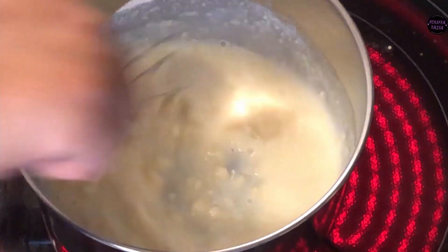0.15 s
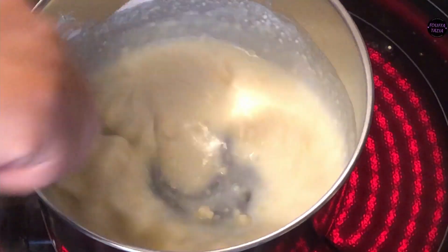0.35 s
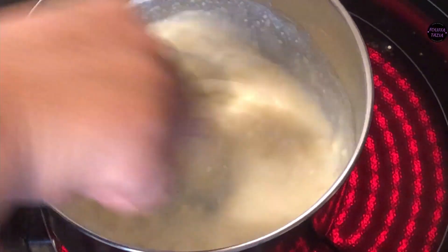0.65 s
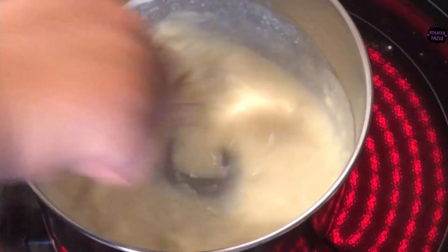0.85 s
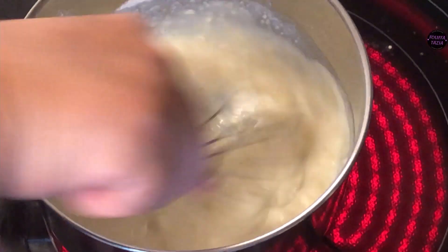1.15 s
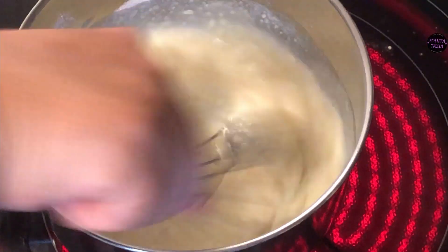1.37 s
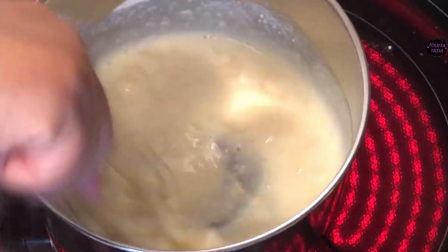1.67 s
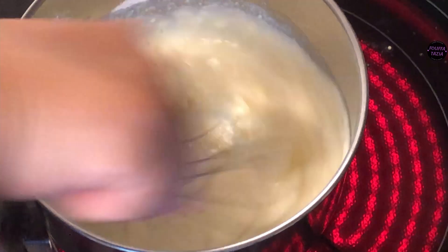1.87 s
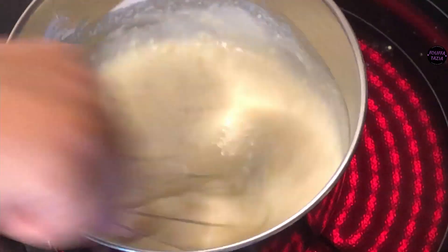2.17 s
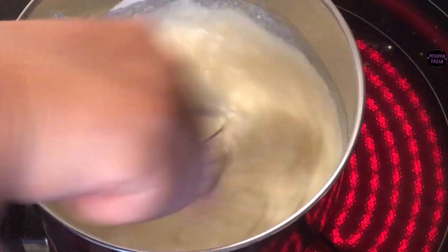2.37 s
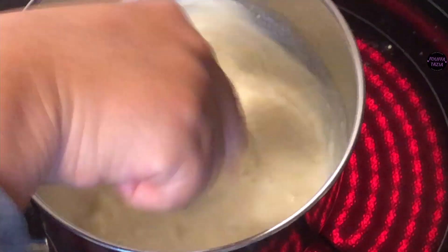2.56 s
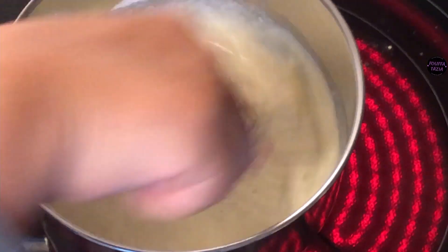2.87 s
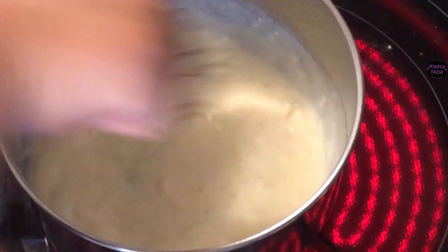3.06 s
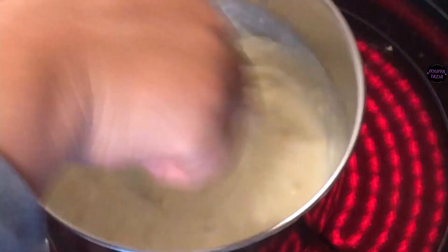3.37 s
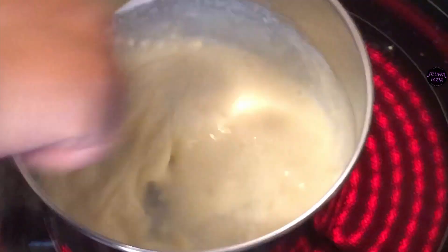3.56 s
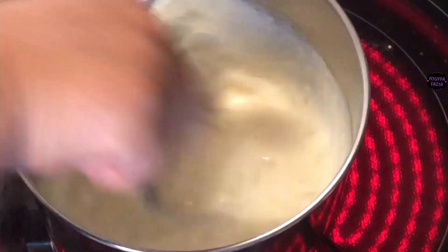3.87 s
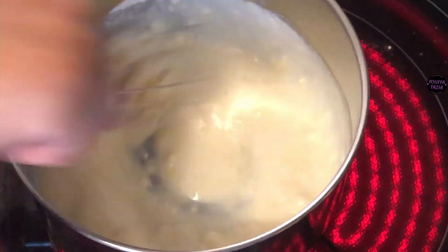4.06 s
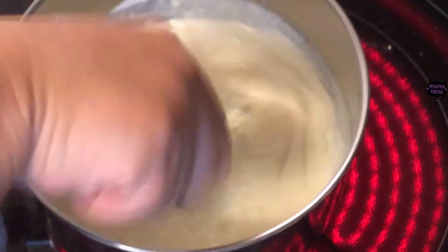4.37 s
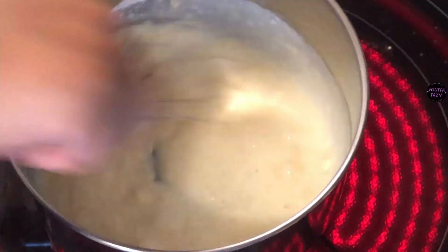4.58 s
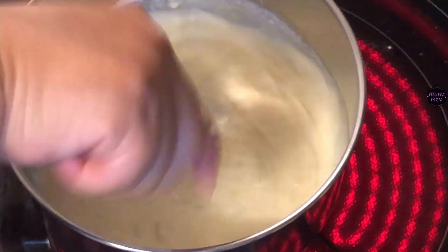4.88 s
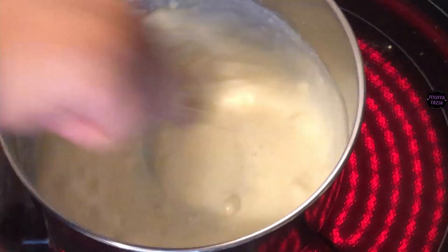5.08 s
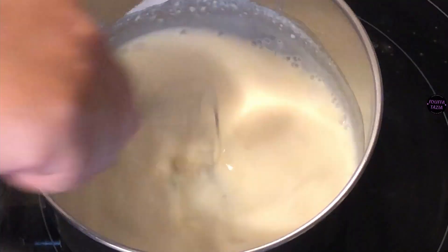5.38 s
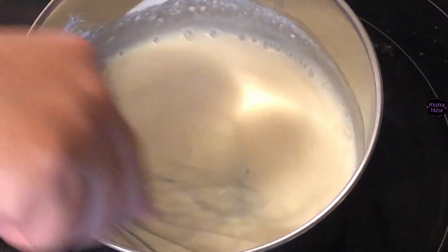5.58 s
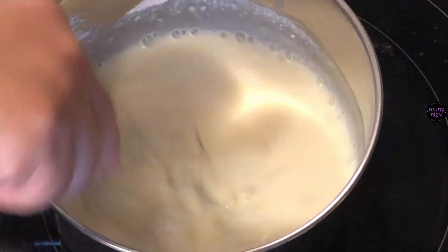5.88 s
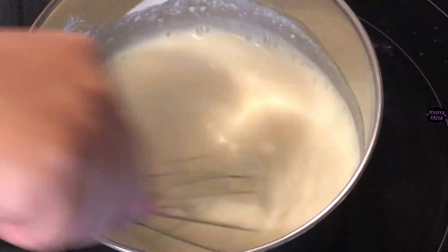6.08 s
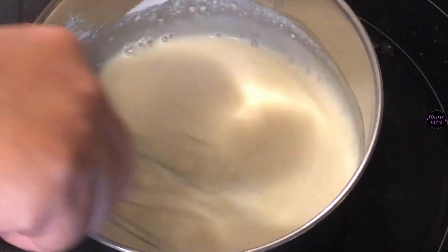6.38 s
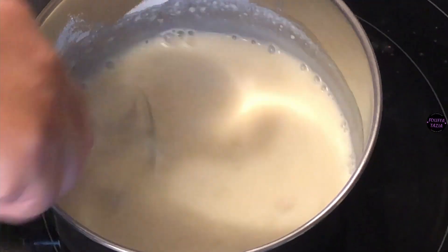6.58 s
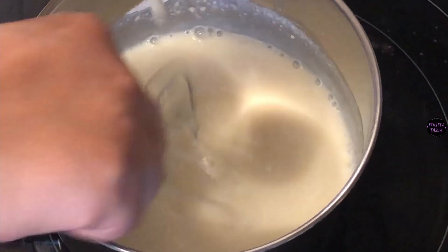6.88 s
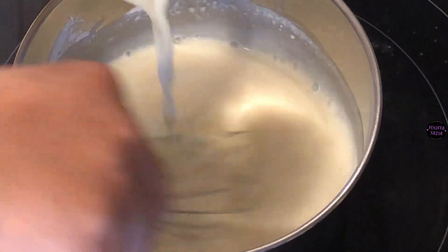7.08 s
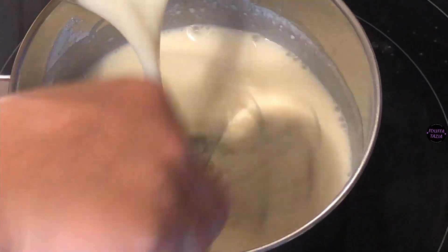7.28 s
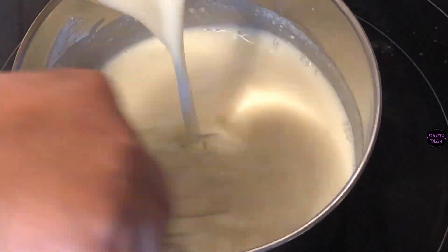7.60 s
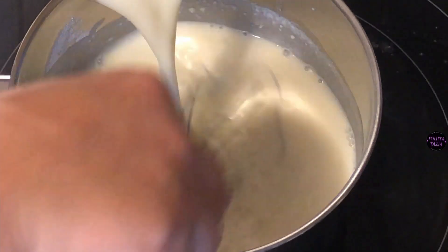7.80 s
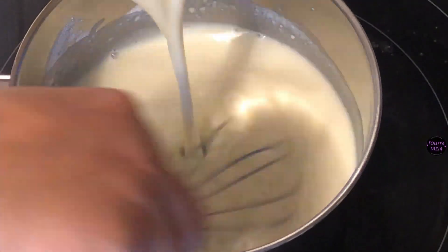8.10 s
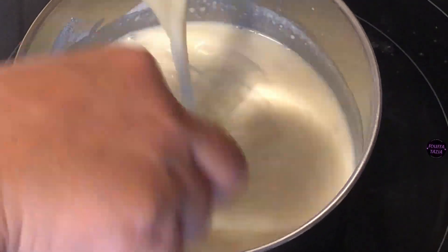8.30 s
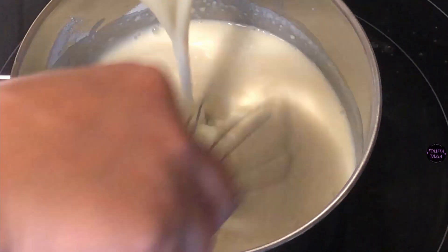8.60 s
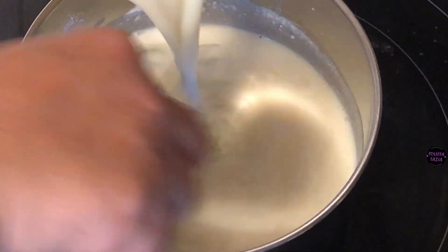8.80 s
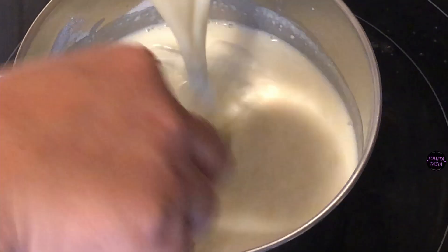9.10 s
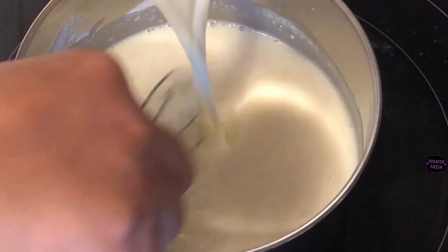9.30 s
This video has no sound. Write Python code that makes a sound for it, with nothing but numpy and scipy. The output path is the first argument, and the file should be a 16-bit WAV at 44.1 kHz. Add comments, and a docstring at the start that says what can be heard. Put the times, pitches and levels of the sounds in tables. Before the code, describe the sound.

A wire whisk sweeps quickly round a steel saucepan, close to a small microphone. Scratchy rubbing strokes and thin hiss come several times a second, with bright clinks on the wall and tiny wire snaps. Midway the sauce is thinner and the strokes softer, with a faint metallic singing; then milk splashes in with dense little plops. Two distant hollow knocks echo in the kitchen over low hum.

```python
"""A kitchen hob: a wire whisk is swept round a steel saucepan of thin sauce, close to a small microphone.
The wires scrape the base (stick-slip noise through the pan's modes) and sing once the sauce is thinner.
They clink on the wall (a crack and ringing modes) and snap against each other (bare bright clicks).
Sauce and, later, poured milk plop as short rising tones. Further off something knocks twice, mostly
as reverberation, and appliances hum under it all (shaped noise and wavering tones)."""
import sys
import numpy as np
from scipy import signal
from scipy.fft import rfft, irfft
from scipy.io import wavfile
from scipy.ndimage import uniform_filter1d

SR = 44100
rng = np.random.default_rng(int(sys.argv[2]) if len(sys.argv) > 2 else 0)


def generate_wav(sig):
    """Save sig (samples, or channels by samples) to the path in sys.argv[1] as 16-bit PCM at SR."""
    pcm = np.round(np.clip(np.atleast_2d(sig).T, -1, 1) * 32767).astype(np.int16)
    wavfile.write(sys.argv[1], SR, pcm)


N = 416744  # samples

THIN_S, POUR_S = 5.22, 7.1  # the sauce is thinner from here on; milk starts to splash in

# Ringing modes of pan and wires, the first four below 3.5 kHz: pitch_hz, level_db, t60_s
PAN_MODES = [(1585, 0, 0.05), (2412, 2, 0.1), (2802, 2, 0.1), (3440, -4, 0.09), (3640, -4, .1),
             (4150, -4, .1), (4400, -1, .13), (4660, -6, .13), (4925, -1, .12), (5730, -1, .09),
             (5932, -4, .24), (6850, -2, .06), (9880, -3, .05), (10600, 1, .035)]


def amp(db):
    """Decibels to amplitude."""
    return 10 ** (np.asarray(db) / 20)


def evened(x):
    """Scales x to rms 1."""
    return x / np.sqrt(np.mean(x ** 2) + 1e-20)


def add(mix, s, sound):
    """Adds a sound into the mix at s seconds, cut off at the end."""
    part = mix[round(s * SR):][:len(sound)]
    part += sound[:len(part)]


def coloured(x, points):
    """Shapes x by a spectrum of (Hz, dB) points, to rms 1."""
    point_hz, point_db = np.transpose(points)
    hz = np.fft.rfftfreq(len(x), 1 / SR)
    gain_db = np.interp(np.log(hz + 1), np.log(point_hz), point_db)
    return evened(irfft(rfft(x) * amp(gain_db), len(x)))


def resonate(x, hz, width_hz):
    """A resonance of gain 1 that follows hz: shift down, smooth, shift back."""
    turn = np.exp(2j * np.pi * np.cumsum(hz * np.ones(len(x))) / SR)
    r = np.exp(-np.pi * width_hz / SR)
    return 2 * (turn * signal.lfilter([1 - r], [1, -r], x / turn)).real


def wander(per_s, count):
    """Slow random curves: straight lines between normal draws, per_s of them a second."""
    steps = rng.standard_normal((count, int(per_s * N / SR) + 2))
    at = np.arange(N) / SR * per_s
    return [np.interp(at, np.arange(len(row)), row) for row in steps]


def kitchen():
    """Appliances: steady shaped noise, and hum lines that a narrow band of noise makes waver."""
    # Spectrum of the background noise: freq_hz, level_db
    room_spectrum = [(30, -9), (42, -15), (52, 6.5), (130, -4.5), (260, -14), (450, -28), (1000, -14),
                     (2300, -6), (4000, -20.5), (16000, -33)]
    # Hum lines: pitch_hz, width_hz, level_db (of the steady tone)
    hum_lines = [(120, 8, -64), (178, 5, -69), (1390, 10, -71)]
    t = np.arange(N) / SR
    noise = rng.standard_normal(N)
    out = amp(-55.5) * coloured(rng.standard_normal(N), room_spectrum)
    for hz, width_hz, db in hum_lines:
        tone = evened(np.sin(2 * np.pi * hz * t))
        waver = evened(resonate(resonate(noise, hz, width_hz), hz, width_hz))
        out = out + amp(db) * (tone + width_hz / 20 * waver)
    return out


def knocks():
    """Far off, a knock arrives mostly as reverberation: a soft rise, hollow rings, a long fade."""
    # The distant knocks: start_s, level_db (before the soft rise)
    knock_times = [(5.297, -21.5), (7.628, -23)]
    # Spectrum of their noise: freq_hz, level_db
    knock_spectrum = [(450, -35), (800, -20.5), (1300, -6), (2300, -5), (4000, -15), (9000, -39)]
    # Their hollow rings: pitch_hz, width_hz, level_db (against each other)
    hollow_rings = [(1374, 8, -2), (1784, 25, 5.5), (2146, 61, 4)]
    t60_s = 0.41
    out, t = np.zeros(N), np.arange(SR // 2) / SR
    rise = 1 - np.exp(-(t / 0.028) ** 0.71)
    for s, db in knock_times:
        noise = rng.standard_normal(len(t))
        rings = sum(amp(ring_db) * evened(resonate(noise, hz, width_hz))
                    for hz, width_hz, ring_db in hollow_rings)
        body = coloured(noise, knock_spectrum) + 0.55 * evened(rings)
        add(out, s, amp(db - 60 * t / t60_s) * body * rise)
    return out


def stroke_db(t, column, sag_db, fall_db):
    """Every pass rises, holds with a slight sag and falls away; passes add in power over the rest level."""
    # Passes of the wires over the base: start_s, hold_s, rub_db, hiss_db
    passes = [(0.098, 0.028, -36.5, -41.5), (0.46, 0.26, -47, -58), (0.909, 0.036, -41.5, -45),
              (1.59, 0.045, -35.5, -45.5), (1.864, 0.16, -48, -50), (2.03, 0.12, -42.5, -39),
              (2.263, 0.1, -48.5, -43.5), (2.39, 0.087, -44, -64), (2.635, 0.031, -53, -40),
              (2.825, 0.078, -67, -43), (2.982, 0.0062, -41, -47), (3.062, 0.095, -44.5, -41.5),
              (3.387, 0.081, -54, -42.5), (3.528, 0.011, -38, -61), (3.589, 0.0065, -60, -40.5),
              (3.722, 0.027, -49, -40), (3.918, 0.073, -47.5, -40.5), (4.134, 0.082, -43, -40),
              (4.547, 0.017, -38.5, -53), (4.704, 0.0073, -49, -45.5), (4.882, 0.12, -45.5, -45),
              (5.113, 0.05, -43, -41.5), (5.258, 0.059, -43.5, -44.5), (5.54, 0.025, -53, -47),
              (5.803, 0.078, -46.5, -49.5), (6.027, 0.16, -45, -48.5), (6.304, 0.045, -44.5, -44.5),
              (6.423, 0.12, -38.5, -43.5), (6.661, 0.064, -48, -44), (6.768, 0.026, -49.5, -44.5),
              (7.04, 0.15, -55.5, -47), (7.267, 0.12, -64, -42.5), (7.494, 0.2, -42.5, -44.5),
              (7.854, 0.12, -47.5, -43), (8.04, 0.17, -72, -43.5), (8.353, 0.12, -44, -45),
              (8.63, 0.12, -39.5, -46.5), (8.904, 0.26, -41, -48.5), (9.213, 0.054, -40.5, -42)]
    # Light contact between the passes: time_s, rub_db, hiss_db
    light_contact = [(0.0, -44.5, -53.5), (1.5, -46, -51), (4.3, -49, -54), (5.3, -57, -62.5),
                     (5.7, -60, -60.5), (7.0, -65.5, -56.5), (7.4, -44, -82), (9.45, -52.5, -62.5)]
    rise_db = 463  # per second, like sag_db and fall_db
    start, hold, peak_db = np.array(passes)[:, [0, 1, column + 1], None].transpose(1, 0, 2)
    since = t - start
    rise = rise_db * np.minimum(since, 0)
    sag = sag_db * np.maximum(since, 0)
    fall = fall_db * np.maximum(since - hold, 0)
    power = (amp(peak_db + rise - sag - fall) ** 2).sum(0)
    rest_columns = np.transpose(light_contact)
    rest_db = np.interp(t, rest_columns[0], rest_columns[column])
    return 10 * np.log10(power + amp(rest_db) ** 2), rest_db


def sweep():
    """The whisk's motion every 2 ms: levels of rub and hiss, and how far the hiss stands above rest."""
    s = np.arange(0, N / SR, .002)
    rub_db, _ = stroke_db(s, column=1, sag_db=5, fall_db=129)
    hiss_db, rest_db = stroke_db(s, column=2, sag_db=19.5, fall_db=189)
    return s, rub_db, hiss_db, hiss_db - rest_db


def random_droplets():
    """Droplets fall at random, densely once milk pours in, and louder where the whisk is louder."""
    when, size, pitch, length = rng.random((1600, 4)).T
    when = np.interp(when, [0, .15, 1], [0, POUR_S, N / SR])  # 15 % of them before the milk
    s, rub_db, hiss_db, _ = sweep()
    whisk_db = np.interp(when, s, (rub_db + hiss_db) / 2)
    level_db = whisk_db + np.where(when < POUR_S, 2, 5) + 11 * size ** 3
    # pitches crowd where the pan's modes crowd
    hz = np.interp(pitch ** 2 * len(PAN_MODES), np.arange(len(PAN_MODES)), np.transpose(PAN_MODES)[0])
    return list(zip(when, level_db, hz, 12 + 40 * length ** 2))


def plops():
    """A bubble rings a few cycles and rises in pitch, with a tick as the surface breaks."""
    # Single plops of sauce: start_s, level_db, pitch_hz (at the start)
    single_plops = [(0.6494, -22.5, 2660), (1.8537, -28, 2200), (2.1218, -25, 1490), (4.188, -18.5, 2300),
                    (6.033, -25, 5460), (6.286, -30, 3400), (6.966, -33.5, 1514), (7.1147, -27.5, 1810),
                    (7.1618, -28, 2210), (7.2094, -32, 3680), (7.243, -27, 2680), (7.305, -33, 1520),
                    (7.354, -34, 1590), (7.371, -30, 1510), (7.384, -19.5, 2760), (7.4824, -22.5, 2720),
                    (7.298, -27, 5040), (7.859, -26, 2720), (7.898, -18.5, 3340), (8.023, -26, 4600),
                    (8.114, -22.5, 5700), (8.177, -23, 3440), (8.2314, -26, 3180), (8.3206, -25, 5840),
                    (8.368, -25.5, 5000), (8.693, -31, 1600), (8.924, -19, 2310), (8.959, -32.5, 1500),
                    (8.981, -38, 1520), (9.1025, -22, 5460), (9.261, -24, 4350)]
    out, t = np.zeros(N), np.arange(SR // 20) / SR
    bubbles = [(*row, 45) for row in single_plops] + random_droplets()
    for s, db, hz, cycles in bubbles:  # cycles of the starting pitch to die by 60 dB
        envelope = amp(db - 60 * t * hz / cycles) * np.minimum(t * hz / 2, 1)
        ring = envelope * np.sin(2 * np.pi * hz * (t + 0.88 * t ** 2))
        tick_hz = 4500 + 3 * (hz % 1500)
        tick = amp(db - 10 - 60 * t / .004) * np.sin(2 * np.pi * tick_hz * t)
        add(out, s, tick + ring)
    return out


def ticks():
    """Wire snaps against wire: a click of noise rings the thin wire briefly at a very high pitch."""
    # The snaps: start_s, level_db (before halving)
    snaps = [(2.0039, -30), (2.1211, -16), (2.6224, -20), (2.8674, -21), (3.1592, -22), (3.7244, -23),
             (4.1869, -18.5), (5.1537, -23), (7.5542, -27), (8.1629, -22), (8.958, -22), (9.2085, -34)]
    wire_hz, width_hz, t60_s = 13500, 4000, .007
    out, t = np.zeros(N), np.arange(SR // 50) / SR
    for s, db in snaps:
        click = rng.standard_normal(len(t))
        snap = evened(resonate(resonate(click, wire_hz, width_hz), wire_hz, width_hz))
        add(out, s, amp(db - 60 * t / t60_s) * snap / 2)
    return out


def clinks():
    """Wires strike the wall: a tick, a noisy crack and the modes, strongest near the wire's own note."""
    # The blows: start_s, blow_db, dull_db (low modes, before a boost and a cap), note_hz, ring_factor
    blows = [ (1.731, -15, -17, 5932, 1), (2.0036, -8, -17, 5600, 0.89), (2.1205, -25, -17, 9900, 0.5),
             (2.2608, -13.5, -23, 5900, 0.16), (2.274, -19.5, -29, 5640, 1), (2.3479, -22, -24, 5720, 0.45),
             (2.595, -22, -33, 6860, 0.28), (2.779, -14, -45, 5840, 1), (2.867, -22.5, -2, 6920, 0.35),
             (3.039, -13, -30, 5850, 0.41), (3.059, -14.5, -15, 2412, 1), (3.2851, -27, -2, 2800, 0.37),
             (3.307, -19, -6, 5800, 0.96), (3.384, -20, -23, 6200, 0.23), (3.4303, -20, 1, 9900, 0.22),
             (3.565, -23, -18, 4920, 1), (3.684, -21.5, 0, 5850, 0.23), (3.83, -20, -9, 5900, 0.52),
             (3.9038, -16.5, -19, 5700, 0.61), (4.129, -21, -7, 4580, 0.62), (4.4235, -25, -2, 6700, 0.26),
             (4.441, -13, -35, 10600, 0.051), (4.501, -30.5, 9.5, 4920, 0.24),
             (4.8728, -9, -3.5, 6860, 0.17), (5.108, -26, 2, 5800, 0.39), (5.1937, -21, -3, 9900, 0.23),
             (6.642, -16.5, -39, 11300, 0.37), (7.95, -28.5, 15, 4630, 0.87),
             (8.1967, -23.5, 0.5, 4930, 0.6), (8.4664, -20, 2.5, 7300, 0.25)]
    # Spectrum of the crack: freq_hz, level_db
    crack_spectrum = [(700, -72), (1770, 0.5), (2560, -10.5), (4430, -7.5), (5840, 2.5), (10500, 1.5),
                      (12000, -8), (16000, -23)]
    out, t = np.zeros(N), np.arange(SR // 4) / SR
    hz, level_db, t60_s = (c[:, None] for c in np.transpose(PAN_MODES))
    total = np.linalg.norm(amp(level_db))
    chance = rng.standard_normal((len(blows), 2, len(PAN_MODES), 1))
    for (s, db, dull_db, note_hz, ring), (place, phase) in zip(blows, chance):
        dull = np.where(hz < 3300, np.minimum(dull_db + 6, 4), 0)
        near_note = 8 * np.exp(-(np.log(hz / note_hz) / .035) ** 2)
        gains = amp(level_db + 3 * place + dull + near_note - 60 * t / (t60_s * ring))
        beating = 1 + .7 * np.sin(2 * np.pi * (hz / 100 * phase * t + place))  # close pairs beat
        gains = gains * beating
        modes = gains * np.sin(2 * np.pi * (hz * (1 + place / 600) * t + phase))
        wires = gains * np.sin(2 * np.pi * hz * (1 + phase / 20) * t)  # each wire adds a note nearby
        ringing = (modes.sum(0) + wires.sum(0) / 2) / total
        noise = coloured(rng.standard_normal(len(t)), crack_spectrum)
        crack = noise * (0.94 * amp(-60 * t / 0.016) + .5 * amp(-60 * t / (0.066 * ring)))
        tick = 1.1 * amp(-60 * t / 0.006) * np.gradient(rng.standard_normal(len(t)))
        onset = np.minimum(t / 0.00051, 1)
        add(out, s, amp(db - 10.5) * (ringing + tick + crack) * onset)
    return out


def slips(per_s, spread_db):
    """Stick-slip: noise under a dense train of short bursts of uneven size."""
    size = amp(spread_db * np.minimum(rng.exponential(1, N), 5))
    train = size * (rng.random(N) < per_s / SR)
    burst = np.exp(-np.arange(1500) / (.003 * SR))
    envelope = evened(signal.oaconvolve(train, burst)[:N] + 4.5)  # the bursts stand on a steady floor
    return envelope * rng.standard_normal(N)


def patchy(x, depth_db):
    """Wires touch unevenly: the colour flickers in patches of time and pitch."""
    z = signal.stft(x, nperseg=256)[2]
    patches = rng.standard_normal(z.shape[::-1])
    patches = uniform_filter1d(patches, size=9, axis=0)  # along time
    patches = uniform_filter1d(patches, size=14, axis=1)  # along pitch
    return signal.istft(z * amp(depth_db * evened(patches).T), nperseg=256)[1][:N]


def rub_or_hiss(spectrum, modes, ring):
    """Slips make shaped noise and shake the modes, which change as the contact moves."""
    drive = slips(per_s=200, spread_db=3.2)
    contact = wander(per_s=6.6, count=len(modes))
    rung = 0
    for bend, swell, (hz, level_db, _) in zip(contact[::-1], contact, modes):
        damped = evened(resonate(drive, hz * (1 + bend / 30), hz / 30))
        rung = rung + amp(level_db / 2 + 4.5 * swell) * damped
    return evened(coloured(drive, spectrum) + ring * evened(rung))


def singing(glide, tight):
    """Wires gliding through thinned sauce sing in broad bands, lower where the wires are slack."""
    # The singing bands: pitch_hz (with tight wires), level_db (against each other)
    sung_bands = [(3520, 8), (5400, 1), (6500, 0.5), (7900, 1.5), (10400, -1.5)]
    slack = .18  # slack wires sing this share lower
    bend = 1 - slack * (1 - tight)
    sway, *swells = wander(per_s=14, count=1 + len(sung_bands))
    bands = 0
    for (hz, db), swell in zip(sung_bands, swells):
        band = evened(resonate(glide, hz * (bend + sway / 50), hz / 32))
        bands = bands + amp(db + 3 * swell) * band
    return evened(bands)


def scrape():
    """The wires rub the base and hiss; in thinned sauce they sing instead, unless pressed on the base."""
    # Spectrum of the rub: freq_hz, level_db
    rub_spectrum = [(500, -120), (1100, -9), (1600, -3.5), (2400, 3), (3400, -1), (4400, -8.5), (7000, -23)]
    # Spectrum of the hiss: freq_hz, level_db
    hiss_spectrum = [(2500, -18), (3400, -10), (5000, 4.5), (8000, 1.5), (10500, -3.5), (12000, -5),
                     (16000, -3)]
    lag, flex_db = .05, 9  # share of its way that tension moves in 2 ms; rise above rest that tightens
    s, rub_db, hiss_db, press_db = sweep()
    t = np.arange(N) / SR
    hiss_level_db = np.interp(t, s, hiss_db)
    rub = amp(np.interp(t, s, rub_db)) * rub_or_hiss(rub_spectrum, PAN_MODES[:4], ring=.55)
    hiss = amp(hiss_level_db) * rub_or_hiss(hiss_spectrum, PAN_MODES[4:], ring=.4)

    tight = signal.lfilter([lag], [1, lag - 1], np.tanh(press_db / flex_db))
    glide = rng.standard_normal(N)
    free = np.sqrt(tight) / (1 + amp(rub_db - hiss_db - 9) ** 2)  # wires pressed on the base are damped
    calm = (t > THIN_S) * np.where(t < POUR_S, 1, .65)  # splashing drowns the singing
    calm = calm * np.interp(t, s, free)
    sung = amp(hiss_level_db - 1.0) * calm * singing(glide, np.interp(t, s, tight))

    rumble = evened(resonate(resonate(glide, 150, 90), 150, 90))
    shake = amp(hiss_level_db - 22) * rumble  # the pan shakes on the hob
    return shake + patchy((rub + hiss) * (1 - 0.75 * calm) + sung, depth_db=3.2)


def scene():
    """Sums all layers; blows and plops also echo briefly off bowl and walls."""
    blows, drops = clinks() + ticks(), plops()
    t = np.arange(SR // 4) / SR
    tail = rng.standard_normal(len(t)) * amp(-60 * t / 0.088) * (t > .003)
    wet = signal.oaconvolve(blows + drops / 2, tail / np.linalg.norm(tail))[:N]
    return (kitchen() + knocks() + drops + blows + amp(-3.5) * wet + scrape())[None]


def record(dry):
    """The microphone has a dip in the low middle; then the treble is cut off above 15.8 kHz."""
    dipped = signal.lfilter(*signal.iirnotch(460, 1.3, SR), dry) + 0.035 * dry
    band_limit = signal.firwin(511, 15800, window=("kaiser", 9), fs=SR)
    return signal.oaconvolve(dipped, band_limit[None], "same")


dry = scene()
out = record(dry)
generate_wav(out)
```